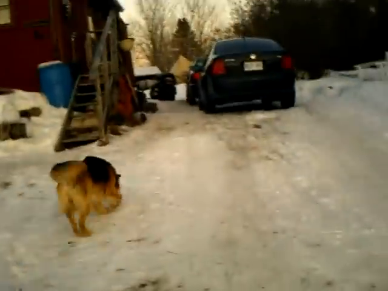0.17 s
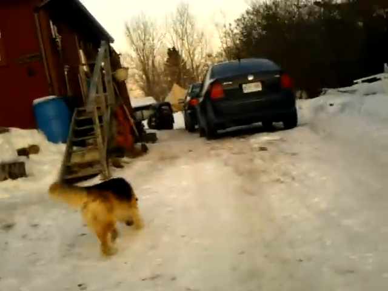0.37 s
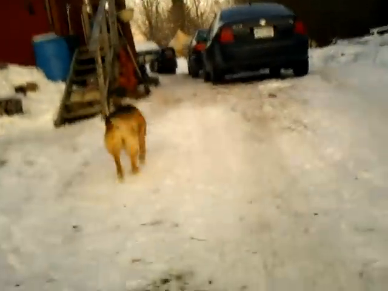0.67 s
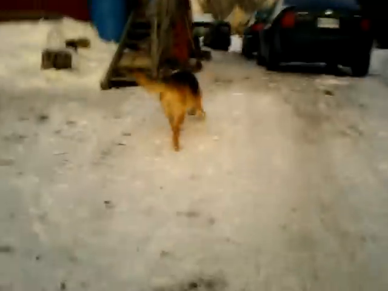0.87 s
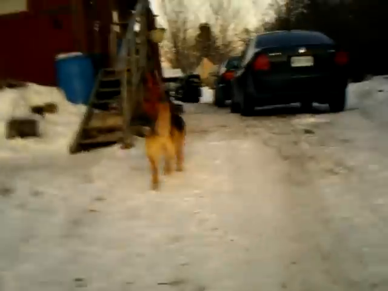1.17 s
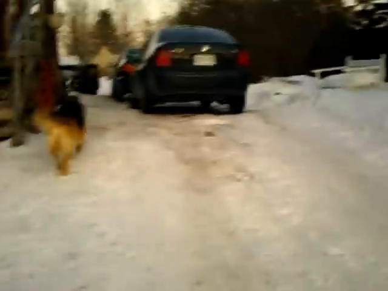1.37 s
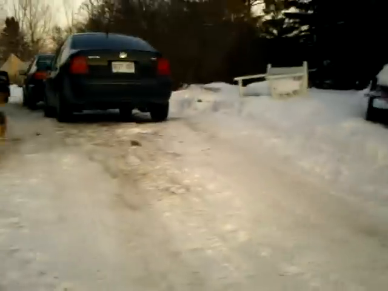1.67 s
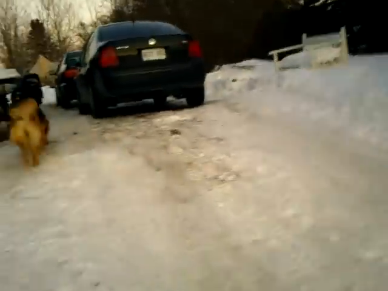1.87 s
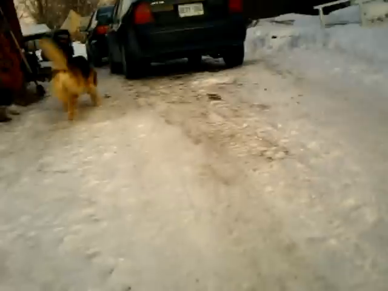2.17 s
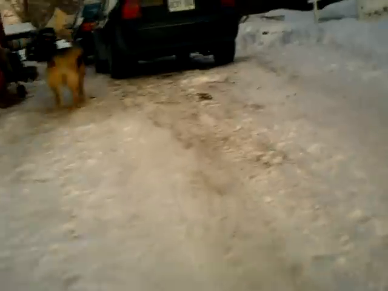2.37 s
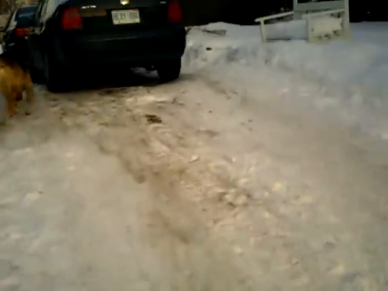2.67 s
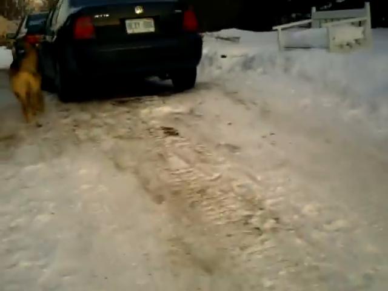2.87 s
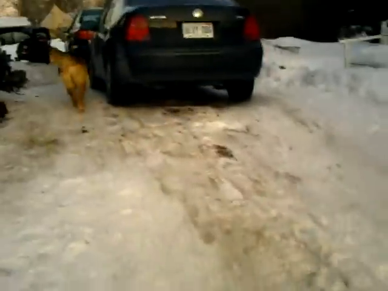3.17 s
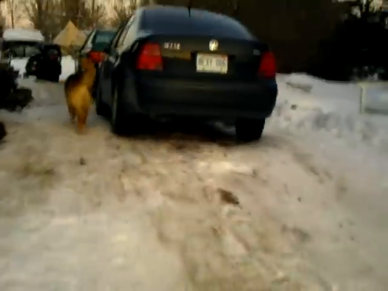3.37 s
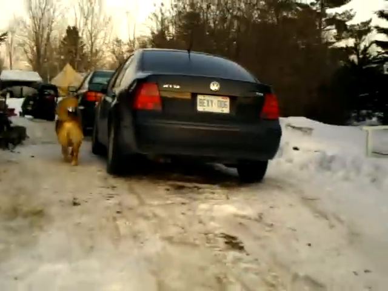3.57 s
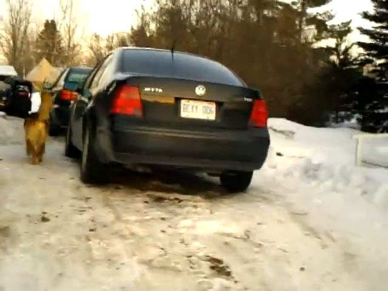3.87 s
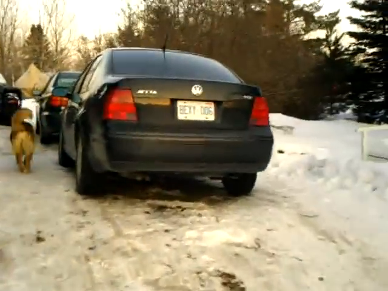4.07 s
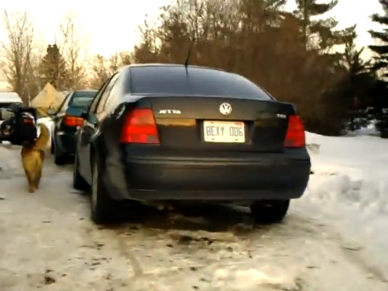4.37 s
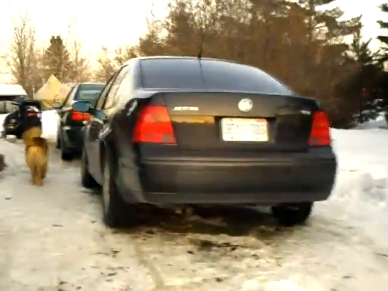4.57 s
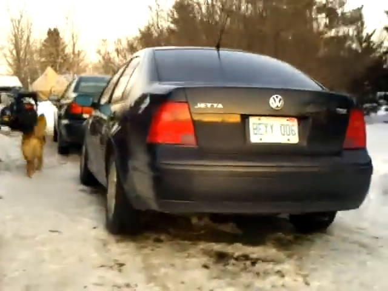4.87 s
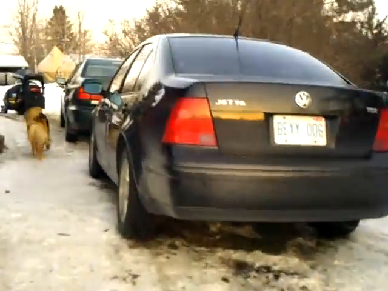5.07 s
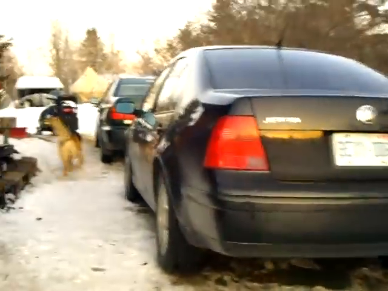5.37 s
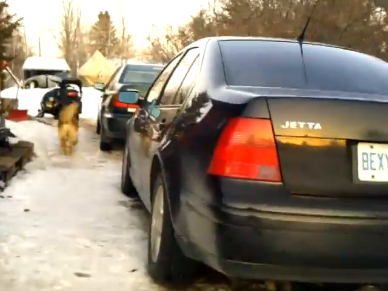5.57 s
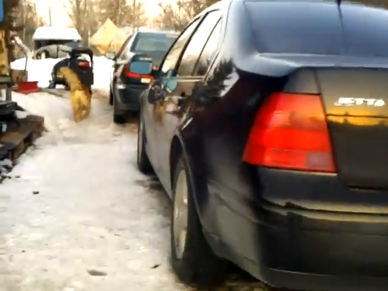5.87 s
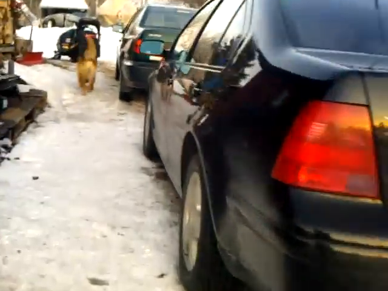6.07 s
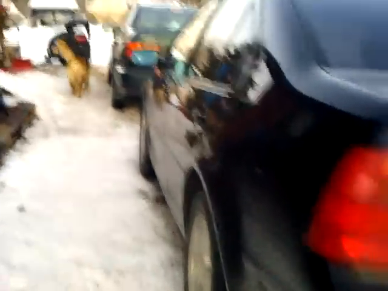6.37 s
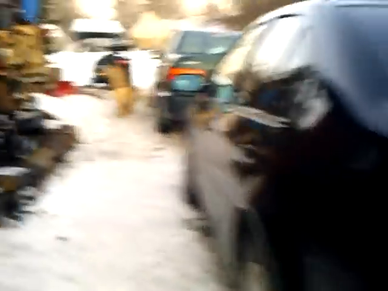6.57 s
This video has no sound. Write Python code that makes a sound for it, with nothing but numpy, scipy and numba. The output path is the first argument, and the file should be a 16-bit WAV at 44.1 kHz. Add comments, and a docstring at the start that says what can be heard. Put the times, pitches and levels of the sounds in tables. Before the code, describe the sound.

A small handheld camera outdoors on an icy driveway. From 0 to 3 seconds, loud close handling noise dominates: a glove or sleeve scrapes the case in rough, uneven strokes, with hollow low-mid resonance and bright plastic ringing. A blunt knock and sharp snag hit around 0.3, more catches near 0.7 and 0.9, a long rub from 1.3 swelling to a strong scrape at 1.6-1.9, shorter ones at 2.0-2.4, and a last soft rub near 2.9. Low wind buffets the microphone, strongest near 1.5. A crack and small snag come at 3.1, then faint brushes until 3.6. From 3.7 to the end, quiet irregular boot crunches on packed snow, firmest near 4.8, with brittle ice cracks at 4.1-4.3, 4.6, 5.5, 6.0 and 6.3. Soft ticks about every tenth of a second, thin high whine and hiss remain underneath.

```python
"""Walking on icy snow with a small camera

Someone walks up a driveway of packed icy snow, camera in hand. For about three seconds rough scrapes,
likely a glove or sleeve, ring the camera's case: random slips drive resonances, with knocks and wind.
Then quiet boot crunches (clustered grains) and ice cracks (short ringing noise bursts) are left,
over the camera's own soft ticks, whine and hiss. All levels are those before record()."""
import sys
import numpy as np
from scipy import signal
from scipy.fft import rfft, irfft, next_fast_len
from scipy.io import wavfile
from numba import njit

SR = 44100
rng = np.random.default_rng(int(sys.argv[2]) if len(sys.argv) > 2 else 0)


def unload_audio(sound):
    """Save the sound as a 16-bit wav file, at the path given as the first command line argument."""
    columns = np.transpose(np.atleast_2d(sound))
    # keep every value between -1 and 1, then stretch to whole-number steps
    steps = np.round(np.clip(columns, -1, 1) * 32767)
    wavfile.write(sys.argv[1], SR, steps.astype(np.int16))


N = 295766
T = np.arange(N) / SR  # time of every sample in seconds


def undb(db):
    """Turn decibels into a gain."""
    return 10 ** (np.asarray(db) / 20)


def unit(x):
    """Scale to an rms (average strength) of 1."""
    return x / np.sqrt(np.mean(x ** 2))


def peak(x):
    """Scale to a peak of 1."""
    return x / np.abs(x).max()


def add(track, s, sound):
    """Mix a sound into the track, starting at s seconds."""
    i = max(int(s * SR), 0)
    track[i:i + len(sound)] += sound[:N - i]


def colour(x, points):
    """Shape the spectrum by (Hz, dB) points, then scale to rms 1."""
    hz, db = np.transpose(points)
    size = next_fast_len(N, True)
    f = np.maximum(np.fft.rfftfreq(size, 1 / SR), 1)
    gain = undb(np.interp(np.log(f), np.log(hz), db))
    return unit(irfft(rfft(x, size) * gain, size)[:N])


def lowpass(x, hz):
    """Cut steeply above hz."""
    return signal.sosfilt(signal.butter(4, hz, fs=SR, output="sos"), x)


@njit
def moving_bandpass(x, hz, width):
    """State-variable band-pass filter whose centre may move from sample to sample."""
    y, band, low = np.empty(len(x)), 0., 0.
    for i in range(len(x)):
        g, k = np.tan(np.pi * hz[i] / SR), width / hz[i]
        # the tiny constant keeps the filter from slowing down in silence
        v = (band + g * (x[i] - low) + 1e-18) / (1 + g * (g + k))
        band, low, y[i] = 2 * v - band, low + 2 * g * v, k * v
    return y


def resonate(x, hz, width):
    """A resonance with steep sides: the same band-pass twice."""
    hz = hz * np.ones(len(x))
    once = moving_bandpass(x, hz, float(width))
    return moving_bandpass(once, hz, float(width))


def walk(rate):
    """Random wandering with a new target rate times a second; spread near 1."""
    return 1.2 * np.interp(T * rate, np.arange(8192), rng.standard_normal(8192))


def grains(rate, spread_db, patchy_db, patch_rate):
    """Tiny slips at random moments, a few large among many small, bunched in patches; rms 1."""
    hit = rng.random(N) < rate / SR
    size = undb(spread_db * np.minimum(rng.exponential(size=N), 4))
    sign = rng.choice([-1, 1], N)
    return unit(hit * size * sign * undb(patchy_db * walk(patch_rate)))


def swell(s, hold, db, rise, fall):
    """Attack, hold and release as a gain; rise and fall are the seconds taken for 20 dB."""
    before = np.maximum(s - T, 0) / max(rise, .002)
    after = np.maximum(T - s - hold, 0) / max(fall, .002)
    return undb(db - 20 * np.minimum(before + after, 10))


# Soft ticks inside the camera. Each entry: start in seconds.
TICK_TIMES = [3.178, 3.282, 3.381, 3.485, 3.586, 3.688, 3.79, 3.886, 3.991, 4.062, 4.116, 4.224, 4.325,
              4.493, 4.593, 4.760, 4.895, 5.032, 5.19, 5.264, 5.430, 5.565, 5.699, 5.860, 5.935, 6.036,
              6.136, 6.234, 6.371, 6.468, 6.57]
# Thin electronic tones. Each row: pitch in Hz, rms level in dB.
WHINE_TONES = [(3876, -69.5), (7720, -70.5), (7752, -85), (15472, -92.5)]
# Colour of the steady hiss. Each row: frequency in Hz, relative level in dB per Hz.
HISS_COLOUR = [(24, -35), (40, -6.5), (621, -9.5), (2160, -11), (2770, -8.5), (5170, -21), (6980, -20),
               (7520, -18), (8310, -21), (15500, -21.5)]
HISS_DB = -60.5


def camera():
    """The camera's own noise: brief pressure sags as ticks, wavering sines as whine, shaped noise as hiss."""
    ticks, t = np.zeros(N), T[:700]
    from_middle = t - .006
    for s in TICK_TIMES:
        # pressure sags for a few milliseconds, with a quick wobble in the middle
        sag = np.exp(-(from_middle / 0.0033) ** 2)
        wobble = np.exp(-(from_middle / 0.0015) ** 2) * np.cos(2 * np.pi * 290 * from_middle)
        size = undb(-47.5 + 1.6 * rng.standard_normal())
        add(ticks, s, -size * (sag + 1.17 * wobble))
    whine = np.zeros(N)
    for hz, db in WHINE_TONES:
        cycles = np.cumsum(hz + 5 * walk(rate=38)) / SR
        whine += undb(db) * np.sqrt(2) * np.sin(2 * np.pi * cycles)
    hiss = undb(HISS_DB) * colour(rng.standard_normal(N), HISS_COLOUR)
    return ticks + whine + hiss


# Gusts on the microphone. Each row: time of full strength in seconds, level in dB,
# rise time and fall time (one value for both) in seconds per 20 dB.
WIND_GUSTS = [(.31, -32, 0.24), (.85, -36, 0.41), (1.48, -24, 0.13), (1.93, -29.5, 0.89),
              (2.35, -36.5, 0.73), (4.93, -55, 0.29), (6.26, -59.5, 0.48)]
CALM_DB = -66.5  # air between the gusts


def wind():
    """Slow buffeting of the microphone: very low noise swelling with each gust."""
    swells = [swell(s, 0, db, length, length) for s, db, length in WIND_GUSTS]
    gusts = undb(CALM_DB) + np.max(swells, axis=0)
    air = colour(rng.standard_normal(N), [(2, -9), (7, 3), (14, -2.5), (30, -18.5), (60, -18.5),
                                          (150, -34.5), (600, -41), (4000, -110)])
    return gusts * air


# Colour of the crunch. Each row: frequency in Hz, relative level in dB.
SNOW_COLOUR = [(60, -29), (300, -1), (600, -7.5), (1100, 5.5), (1600, -6), (2200, 0), (2900, 12), (3400, 1),
               (4200, -23), (6000, -16), (16000, -25)]
# Boots pressing into the snow and rolling off it.
# Each row: time of full weight in seconds, hold in seconds, level in dB.
BOOT_STEPS = [(3.7, .005, -53), (3.797, .08, -63), (3.977, 0.046, -54), (4.247, 0.1, -55),
              (4.545, 0.11, -58.5), (4.841, 0.021, -46), (4.91, .02, -53), (5.096, 0.076, -53.5),
              (5.202, .08, -58), (5.423, .002, -52), (5.66, 0.024, -53), (5.98, 0.0054, -64),
              (6.238, .07, -51), (6.386, 0.069, -59), (6.6, .005, -49)]
STEP_RISE_S, STEP_FALL_S = 0.053, 0.12  # seconds per 20 dB: weight comes on quickly and rolls off
SHUFFLE_FROM_S, SHUFFLE_DB = 3.7, -63.5  # loose snow stirring between the steps


def boots():
    """Crystals of packed snow break in clusters under each step; a few coarse ones tick on their own."""
    shuffle = swell(SHUFFLE_FROM_S, T[-1], SHUFFLE_DB, STEP_RISE_S, STEP_FALL_S)
    step_power = sum(swell(s, hold, db, STEP_RISE_S, STEP_FALL_S) ** 2 for s, hold, db in BOOT_STEPS)
    weight = np.sqrt(shuffle ** 2 + step_power)
    crystals = grains(rate=3500, spread_db=2.0, patchy_db=2.6, patch_rate=240)
    coarse = grains(rate=90, spread_db=1.0, patchy_db=-0.5, patch_rate=20)
    coarse_ticks = unit(lowpass(resonate(coarse, 1270, 4600), 4300))
    # the coarse crackle follows the weight only loosely
    crackle = undb(-30.5) * weight ** 0.56 * coarse_ticks
    return weight * colour(crystals, SNOW_COLOUR) + crackle


# Ice cracking under the soles. Each row: start in seconds, peak level in dB, ring pitch in Hz.
ICE_CRACKS = [(3.1283, -23, 2960), (4.104, -35, 2700), (4.119, -34, 2490), (4.145, -35, 2770),
              (4.244, -37.5, 2700), (4.259, -32, 2780), (4.281, -36.5, 2780), (4.589, -36.5, 2620),
              (4.646, -29, 1190), (4.685, -32.5, 2700), (5.415, -39, 2900), (5.493, -34.5, 2600),
              (5.603, -31.5, 2270), (5.627, -36.5, 2280), (6.007, -31, 1260), (6.324, -36, 3050),
              (6.379, -34, 2600), (6.639, -40.5, 2200), (6.653, -42, 840)]
CRACK_CYCLES = 27  # the burst that drives a crack falls 60 dB in this many cycles of its ring


def cracks():
    """A plate of ice snaps: a dry, broad tick with a hint of hollow ring, muffled by the sole."""
    out, t = np.zeros(N), T[:2500]
    for s, db, hz in ICE_CRACKS:
        burst = rng.standard_normal(len(t)) * undb(-60 * t * hz / CRACK_CYCLES)
        # the lower a plate rings, the less it is damped and the less it ticks
        ring = peak(resonate(burst, hz, hz ** 2 / 2800))
        tick = peak(resonate(burst, 1200, 4800))
        muffled = lowpass(ring + hz / 2700 * tick, 3160)
        add(out, s, undb(db) * peak(muffled))
    return out


# Knocks on the case. Each row: start in seconds, strength in dB, length of the push in seconds.
CASE_KNOCKS = [(0.3076, 3.5, 0.0042), (0.332, -11, 0.0031), (0.3745, -14.5, 0.0028), (0.663, -9, 0.0012),
               (3.126, -28.5, 0.001), (4.645, -30.5, .0032)]


def knocks():
    """A blunt blow: one damped swing of pressure, a slow sag as the shell settles, a short clack on top."""
    out, t = np.zeros(N), T[:2500]
    for s, db, length in CASE_KNOCKS:
        swing = np.sin(2 * np.pi * t / length) * np.exp(-(t / (0.64 * length)) ** 2)
        sag = -.11 * np.exp(-((t - 2.3 * length) / (.5 * length)) ** 2)
        push = rng.standard_normal(len(t)) * np.exp(-(t / (.5 * length)) ** 2)
        clack = resonate(push, 3340, 740) + 0.63 * resonate(push, 1250, 610) + 0.015 * push
        add(out, s, undb(db) * (0.5 * swing + sag + .5 * peak(clack)))
    return out


# Upper resonances of the case. Each row: centre in Hz, width in Hz, relative level in dB.
CASE_RESONANCES = [(1880, 330, -6), (2500, 450, -8), (3050, 420, 0), (3520, 400, -2), (4010, 330, 0),
                   (4950, 750, -10), (6200, 500, -21)]


def case_ring(x):
    """The upper resonances of the case ring together, every other one with its sign flipped."""
    out = np.zeros(len(x))
    for k, (hz, width, db) in enumerate(CASE_RESONANCES):
        out += (-1) ** k * undb(db) * resonate(x, hz, width)
    return out


# Snags where the scrape catches and lets go. Each row: start in seconds, peak level in dB,
# strength of the low resonance in dB relative to the upper ring.
SCRAPE_SNAGS = [(0.043, -25.5, -13), (0.162, -28, -8), (0.198, -14.5, -4), (0.316, -20, -10),
                (0.356, -5, -21), (0.445, -19, -23), (0.481, -15.5, -10), (0.664, -10, -1),
                (0.669, -13, 13), (0.864, -9.5, 1), (0.877, -12.5, 2.5), (1.093, -15.5, 18),
                (1.142, -16, -6), (1.17, -17.5, 1), (1.85, -9, -4), (1.995, -12.5, 0), (2.0228, -16.5, 4),
                (2.162, -19.5, -1), (2.223, -18.5, 5), (2.443, -9.5, -7), (3.128, -24, 3),
                (4.807, -31.5, -10)]


def snags():
    """A catch lets go in a few milliseconds: a fading noise push rings the same case."""
    out, t = np.zeros(N), T[:1500]
    for s, db, low_db in SCRAPE_SNAGS:
        push = rng.standard_normal(len(t)) * np.exp(-t / .0014)
        upper = peak(case_ring(push))
        low = undb(low_db) * peak(resonate(push, 1315, 770))
        add(out, s, undb(db) * peak(upper + low + 0.19 * peak(push)))
    return out


# Light, airy brushes. Each row: middle in seconds, half length in seconds, level in dB at the middle.
LIGHT_BRUSHES = [(3.182, 0.039, -40.5), (3.277, 0.023, -62), (3.463, 0.031, -47.5), (3.595, 0.043, -45),
                 (4.805, 0.026, -54), (4.914, 0.079, -59)]
# Colour of the brushes. Each row: frequency in Hz, relative level in dB.
BRUSH_COLOUR = [(200, -35), (850, -14), (1200, 5.5), (1500, -9), (1850, -6.5), (2800, -2), (3800, 4.5),
                (4600, -5.5), (6200, -11.5), (7000, -18), (16000, -34)]


def brushes():
    """The same surfaces barely touching: a soft swell of fine, bright grain."""
    touch = sum(undb(db) * np.exp(-((T - s) / half) ** 2) for s, half, db in LIGHT_BRUSHES)
    fine = grains(rate=26000, spread_db=3.5, patchy_db=1.0, patch_rate=510)
    return touch * colour(fine, BRUSH_COLOUR)


# Strokes over the case. Each row: time of full force in seconds, hold in seconds, force level in dB,
# rise in seconds per 20 dB, fall in seconds per 20 dB, high resonance in Hz,
# share of the low resonance in dB, share of the dull rasp in dB.
CASE_STROKES = [(0.012, 0.16, -51, .03, .1, 3470, -1.5, -1.5),
                (0.205, 0.0043, -22, 0.045, .04, 3320, 0, -12.5),
                (0.339, .022, -15.5, 0.023, 0.0077, 3660, -6, -12),
                (0.465, 0.0062, -18.5, 0.027, 0.025, 3700, -11.5, -9),
                (0.513, .14, -37.5, 0.15, .1, 3820, 0.5, -12),
                (0.677, 0.096, -20, 0.048, 0.063, 3900, -8.5, -18),
                (0.818, 0.17, -27.5, 0.2, 0.14, 3630, -4.5, -9.5),
                (1.14, 0.029, -27, 0.28, 0.19, 3565, 0.5, -7),
                (1.333, 0.35, -31, 0.15, 0.13, 3750, -3.5, -8),
                (1.592, 0.033, -15, 0.21, 0.28, 3770, -9.5, -16.5),
                (1.752, 0.032, -11.5, 0.11, 0.12, 4000, -7, -12),
                (1.827, 0.071, -19, 0.018, 0.0049, 3840, 0, -8.5),
                (2.044, 0.0195, -24.5, 0.032, .05, 3240, -6, -6.5),
                (2.111, 0.018, -25.5, 0.029, 0.1, 3250, -6.5, -6),
                (2.204, 0.61, -37.5, 1, 0.067, 3580, -2.5, -4),
                (2.441, .03, -27, 0.033, 0.25, 3310, -9, -6.5), (2.914, .06, -32, 0.53, 0.16, 3670, -3, -5),
                (3.216, 0.034, -48.5, 0.056, 0.19, 3670, -0.5, -4.5),
                (3.368, 0.021, -53, .04, 0.13, 3500, -0.5, -3.5),
                (3.587, .03, -55.5, 0.14, .05, 3600, 4.5, -6)]


def grip():
    """Sum the strokes' power; the stronger a stroke is, the more it sets high resonance, low ring and rasp."""
    power = np.array([swell(*row[:5]) ** 2 for row in CASE_STROKES])
    total = power.sum(axis=0)
    high_hz, low_db, rasp_db = np.array(CASE_STROKES)[:, 5:].T @ power / total
    return 10 * np.log10(total), high_hz, low_db, rasp_db


# Colour of the dull rasp. Each row: frequency in Hz, relative level in dB.
RASP_COLOUR = [(30, -13), (80, -4.5), (200, -8), (550, -0.5), (850, -3), (1600, -2), (2400, -1.5),
               (4000, -5), (16000, -54.5)]
# Colour of the fizz. Each row: frequency in Hz, relative level in dB.
FIZZ_COLOUR = [(1000, -39), (4000, -4), (5600, 3), (6800, -1.5), (7600, 1.5), (9000, -2.5), (11500, -4.5),
               (16000, -10)]
FIZZ_DB = -23  # share of fizz
LIGHT_TOUCH_DB = -29  # force above which the contact firms up
LOW_HZ, LOW_HZ_PER_DB = 1247, 4.5  # the low resonance rises a little with force


def scrape():
    """Stick and slip against the case; the grip shifts its two main resonances."""
    force_db, high_hz, low_db, rasp_db = grip()
    firm_db = np.maximum(force_db - LIGHT_TOUCH_DB, 0)
    low_hz = LOW_HZ + LOW_HZ_PER_DB * firm_db
    judder = undb(0.64 * walk(rate=54) + 0.416 * walk(rate=710))
    # coarse catches shake the ringing parts and the rasp at once; they stand out when the touch is light
    catch_gain = undb(-9.5 - 0.47 * firm_db)
    catches = catch_gain * grains(rate=190, spread_db=3.0, patchy_db=2, patch_rate=20)
    # the contact wanders, so each part is driven a little differently from moment to moment
    slips = []
    for _ in range(4):
        fine = grains(rate=5500, spread_db=2.5, patchy_db=1.76, patch_rate=200)
        slips.append(catches + fine * undb(2.0 * walk(rate=35)))
    low = undb(low_db) * unit(resonate(slips[0], low_hz * (1 + 0.035 * walk(rate=45)), 346))
    high = undb(-6.5) * unit(resonate(slips[1], high_hz * (1 + 0.028 * walk(rate=47)), 383))
    upper = undb(-5.5) * unit(case_ring(slips[2]))
    rasp = undb(rasp_db) * colour(slips[3], RASP_COLOUR)
    # the finest fibres slip most often, so the top is smoother
    finest = grains(rate=9900, spread_db=1.5, patchy_db=1.0, patch_rate=300)
    fizz = undb(FIZZ_DB) * colour(finest, FIZZ_COLOUR)
    return undb(force_db) * judder * (low + high + upper + rasp + fizz)


def scene():
    """Everything reaches one microphone in the open air."""
    background = camera() + wind()
    walking = boots() + cracks()
    handling = knocks() + snags() + brushes() + scrape()
    return (background + walking + handling)[None]


TOP_HZ = 15850  # above this the treble is cut off


def record(dry):
    """The camera rounds the loudest peaks and cuts the top."""
    rounded = np.tanh(0.78 * dry) / 0.82
    return signal.sosfilt(signal.ellip(10, .2, 80, TOP_HZ, fs=SR, output="sos"), rounded)


dry = scene()
out = record(dry)
unload_audio(out)
```